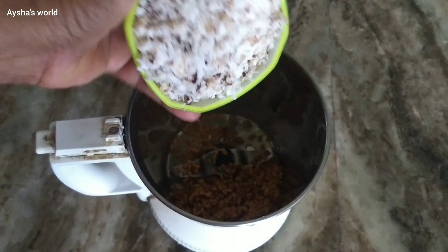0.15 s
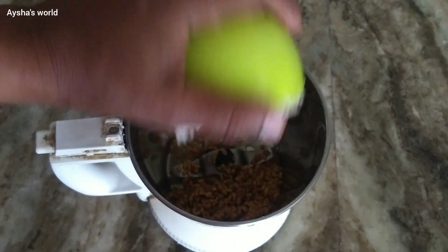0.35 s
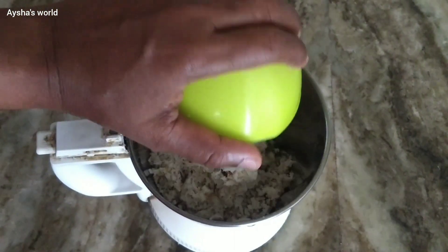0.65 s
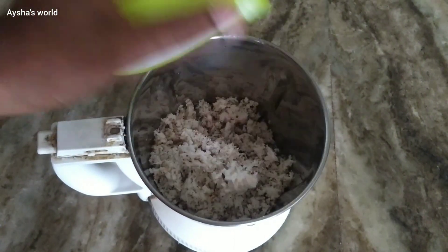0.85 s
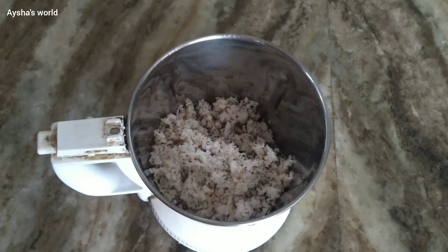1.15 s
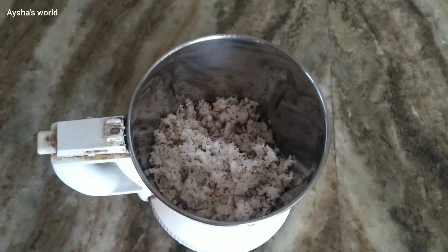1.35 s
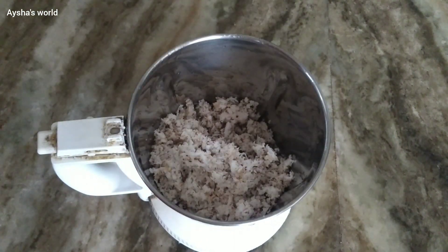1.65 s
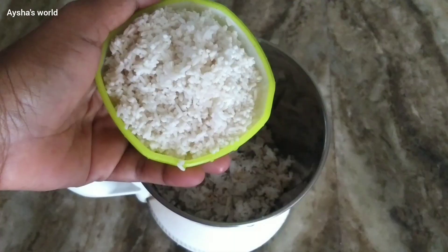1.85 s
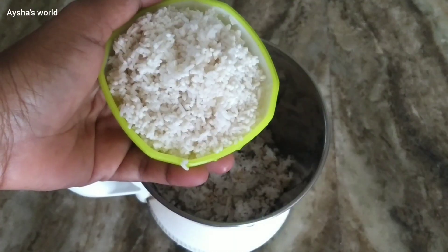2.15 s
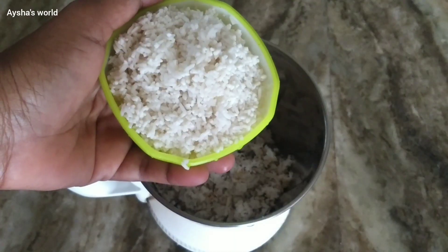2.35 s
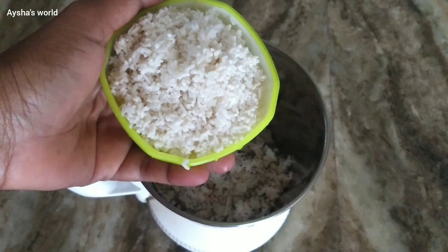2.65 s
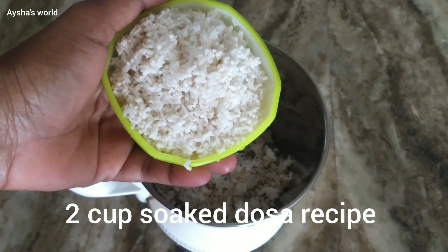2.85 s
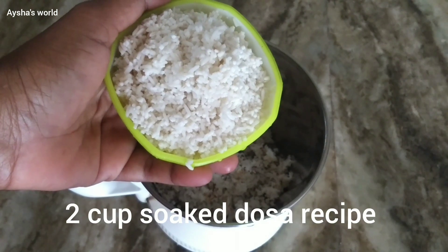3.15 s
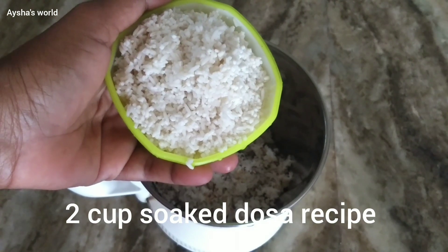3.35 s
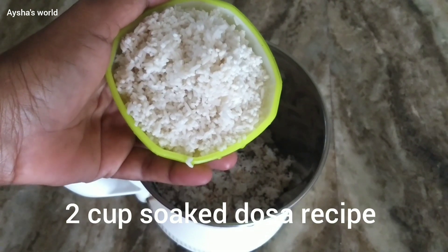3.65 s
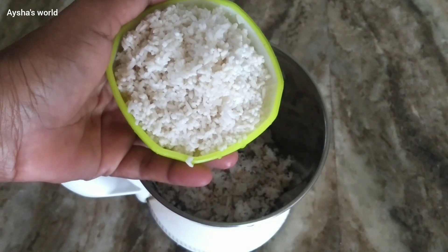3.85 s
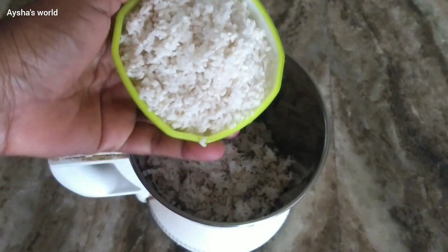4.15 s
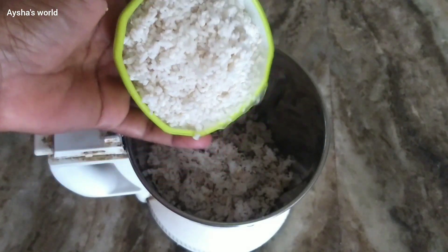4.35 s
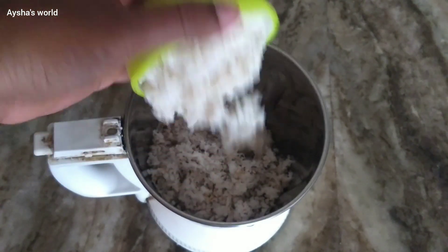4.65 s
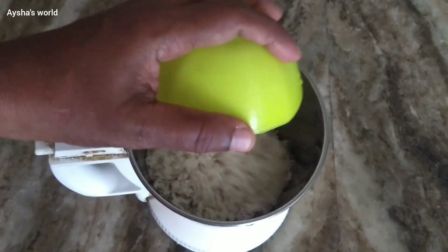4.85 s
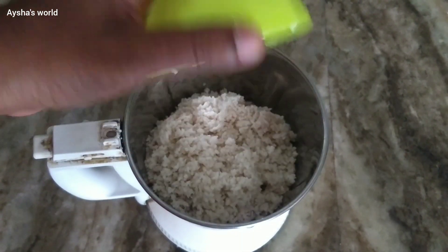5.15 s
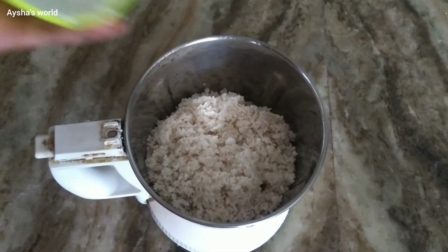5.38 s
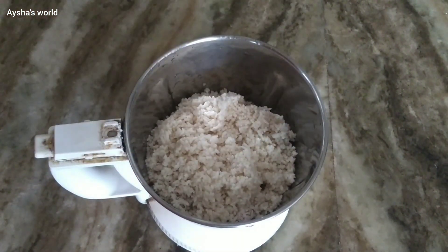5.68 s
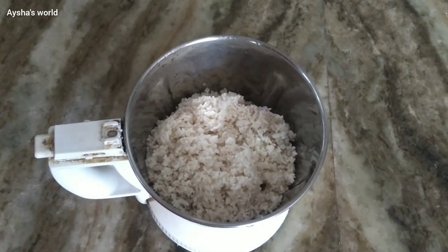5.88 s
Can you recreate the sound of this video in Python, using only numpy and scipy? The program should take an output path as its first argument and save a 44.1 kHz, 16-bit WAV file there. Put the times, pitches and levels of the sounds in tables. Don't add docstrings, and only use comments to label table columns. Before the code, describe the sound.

Steady mid-pitched hum with airy fan rush, metallic clinks and hollow cup knocks, a short silent gap, then more taps and grains sliding into steel.

```python
import sys
import numpy as np
from scipy import signal
from scipy.fft import rfft, irfft, next_fast_len
from scipy.io import wavfile

SR = 44100
rng = np.random.default_rng(int(sys.argv[2]) if len(sys.argv) > 2 else 0)


def voltage_ratio(decibels):
    exponent = np.asarray(decibels, float) / 20
    return 10 ** exponent


def transcribe(signal):
    frames = np.atleast_2d(signal).T
    limited = np.clip(frames, -1, 1)
    pcm = np.round(limited * 32767).astype(np.int16)
    wavfile.write(sys.argv[1], SR, pcm)


N = 265526
HZ = np.fft.rfftfreq(next_fast_len(N), 1 / SR)

LINE_HZ = [50.4, 140, 161.5, 200.2, 226.5, 275.5, 298, 343, 399.7, 500.3, 600.5, 650, 758.2, 775.8, 800.2,
           824.6, 901, 1025, 1350, 1951, 2400, 3400, 5120]
# near_level_db, far_relative_db, wander_hz, unsteady_share (0-1)
LINES = [(-45.5, -2.7, 4, .4), (-47.5, -3, 8, 1), (-52, -3.5, 3, .5), (-48, -1.8, 1, 0.2),
         (-47.5, -3, 6.9, .8), (-46, -2.7, 8.5, 0.9), (-48, -2.5, 12, 1), (-52.5, -3, 7.2, .8),
         (-55, -12, 4, .5), (-53.5, -.5, 4, 0.35), (-74.5, -8.5, 4, .5), (-57.5, -27.5, 36, .95),
         (-48.7, -7, 7, .45), (-50.6, -3.7, 4, .35), (-45.6, 3.7, 9, .36), (-51, -10, 4, .35),
         (-59.5, -3.5, 5, .6), (-60.5, -2, 8, .8), (-58.5, -4, 30, .95), (-55.5, -5, 26, 0.6),
         (-59, -0.5, 130, 1), (-61, 0.5, 90, 1), (-67, -4.5, 40, .95)]
# time_s, level_db
WHINE_LEVEL = [(0.0, -41), (0.17, -43.5), (0.5, -40), (1.05, -42), (1.75, -42.5), (2.9, -42.5), (3.6, -40.5),
               (4.3, -40.5), (4.55, -43), (5, -41), (5.5, -40.5), (5.7, -42), (5.9, -39.5)]
WHINE_HZ = (740, 840)
# frequency_hz, density_db (per Hz)
AIR_SPECTRUM = [(28, -100), (45, -67), (100, -65), (260, -70), (430, -74), (700, -73.5), (950, -98.5),
                (1500, -79.5), (2400, -94.5), (3500, -90), (5500, -92.6), (8500, -100.2), (12000, -103),
                (16000, -104)]
# frequency_hz, likeness (0-1), far_level_db, far_phase_rad
PORT_FIELD = [(50, .98, -2.9, .1), (100, .97, -2.5, -.05), (300, .955, -2.7, -.12), (500, .8, -1.4, -.6),
              (680, .75, -2.5, -.4), (800, .55, -2, .08), (1100, .6, -.6, 0), (1600, .42, -2.4, -1.2),
              (2500, .15, -2.3, -1), (5000, .05, -1.2, 0), (8500, .05, -1.5, 0), (15000, .05, -1.2, 0)]
# centre_hz, width_hz, resting_level_db
RUSTLE_BANDS = [(1100, 1620, -47.5), (2950, 3130, -57), (6300, 2700, -67.5), (11800, 6500, -78)]
# peak_s, level_db (at 3 kHz), rise_s (per 20 dB), fall_s (per 20 dB), tilt_db (per octave)
MOVES = [(.32, -46, .25, .12, -2), (.554, -32, .012, .03, -2), (.582, -45, .015, .25, -2),
         (.87, -44, .025, .3, -7), (1.3, -49, .06, .3, 0), (1.63, -49, .12, .13, -4),
         (2.56, -53, .05, .15, -2), (2.8, -51, .1, .15, -3), (3.158, -45.5, .01, .2, -5),
         (3.282, -38.5, .04, .3, -4.5), (3.77, -53, .05, .2, -2), (3.9, -53, .2, .4, -7),
         (3.995, -50, .02, .3, -1), (4.36, -44, .05, .22, -6), (4.652, -45, .015, .2, -6),
         (5.41, -40, .09, .05, 0), (5.45, -40, .05, .3, -7), (5.87, -51, .1, .2, -3),
         (5.97, -54, .15, .2, -8)]
# peak_s, level_db, rise_s, fall_s, tilt_db (per octave)
POUR = [
    (4.725, -47, .03, .2, 3.5),
    (4.775, -45, .04, .25, 2),
    (4.86, -41, .13, .1, 4),
    (4.92, -40.5, .08, .12, 3.5),
    (4.87, -47, .15, .25, -7),
]
# start_s, peak_db, ring_hz, tail_db
CLINKS = [(0.174, -42, 3440, -20), (0.4858, -40.5, 3390, -10), (0.5288, -31, 3310, -21),
          (1.0196, -41, 3100, -18), (1.1372, -46.5, 3606, -12), (1.2625, -39, 3490, -14),
          (1.6062, -36.5, 3210, -17), (2.5571, -33.5, 3440, -9), (3.0545, -46, 3500, -2),
          (3.2156, -32.5, 3360, -11), (3.7709, -35, 3350, -12), (4.3415, -38, 3420, -5),
          (4.4857, -40, 3220, -9), (4.7619, -36.5, 3770, -6), (4.7781, -33, 3200, -9),
          (4.807, -32, 3270, -23), (5.3592, -27.5, 3440, -40), (5.4035, -27, 3400, -30),
          (5.409, -27, 3100, -30), (5.7453, -46, 3260, -7), (5.8628, -33.5, 3500, -29)]
# start_s, peak_db, ring_hz, tail_db
TICKS = [(0.1999, -38.5, 5550, -13.5), (0.2164, -37, 5450, -8.5), (0.5501, -28, 5240, -25.5),
         (0.7871, -43, 5590, -11), (1.0694, -47, 6200, -10), (1.275, -39.5, 5970, -7.5),
         (1.3433, -34, 5660, -9), (1.6094, -45.5, 5800, -3), (2.7686, -45, 5060, 0.5),
         (3.1602, -41.5, 5700, -4.5), (3.2755, -39, 5550, -14), (3.7474, -42.5, 5820, -10),
         (3.8804, -46, 6100, -10.5), (3.9913, -31.5, 5870, -13), (4.0294, -45.5, 5650, -1),
         (4.7624, -32.5, 5890, -4.5), (4.8444, -30, 6380, -11.5), (4.8844, -35, 5770, -12.5),
         (4.9077, -32.5, 5560, -12), (5.0704, -47, 5980, -15), (5.1327, -44, 5540, -13),
         (5.4041, -30, 5770, -9)]
# start_s, peak_db, ring_hz, tail_db
TAPS = [
    (.216, -28.5, 2100, -9),
    (.5445, -35, 2600, -20),
    (.5512, -25, 1767, -19),
    (.8624, -24.5, 2440, -9),
    (1.5195, -28.5, 2420, -11),
    (3.1555, -35.5, 1780, 1),
    (3.2744, -22, 2370, -12),
    (4.647, -34.5, 2370, -15),
    (5.363, -38.5, 2180, -14.5),
    (5.4325, -24, 2390, -7),
]
# start_s, peak_db, ring_hz, tail_db
KNOCKS = [(0.296, -24.5, 697, -15), (0.316, -28, 720, -8), (0.339, -32, 751, -18), (0.862, -30, 1340, -8.5),
          (1.619, -39, 1000, -4), (3.212, -28, 1120, -18), (3.224, -24, 950, -24), (3.245, -30, 900, -24),
          (3.257, -34.5, 827, -8), (3.269, -28, 1100, -9), (3.284, -27, 1400, -6), (4.647, -31, 760, -20),
          (5.439, -31.5, 1350, -2.5)]
# start_s, peak_db, ring_hz
GRAINS = [(0.4494, -58.5, 11000), (0.5781, -42.5, 12800), (0.6344, -53.5, 13100), (0.8744, -55, 10600),
          (3.2241, -49.5, 12000), (4.3146, -54.5, 12700), (4.6428, -47, 14800), (4.6794, -55.5, 14900),
          (4.7137, -48, 10400), (4.7264, -38.5, 13200), (4.7494, -39.5, 10800), (4.776, -38, 13200),
          (4.8095, -34, 12400), (4.8274, -38, 12400), (4.8404, -35.5, 12400), (4.8539, -29.5, 12300),
          (4.8674, -35, 10800), (4.8994, -41, 13000), (4.9142, -37, 12900), (4.9394, -37, 12900),
          (4.9574, -48, 12500), (5.1462, -53.5, 13100), (5.3644, -46, 14800)]
# start_s, peak_db, ring_hz, t60_s, grip_s (hand closes after)
CUP_NOTE = (.5516, -19, 646, .22, .021)
# start_s, peak_db, ring_hz, tail_db
THUDS = [
    (3.2, -40, 140, 2.5),
    (3.5, -41, 280, 4),
    (5.44, -33, 470, -5),
]
# start_s, peak_db, ring_hz, tail_db
PINGS = [
    (4.598, -33, 7700, -22),
    (4.6435, -33, 14800, -23.5),
]


def over_hz(table, column=1):
    table = np.array(table)
    return np.interp(np.log(HZ + 1), np.log(table[:, 0]), table[:, column])


def shape(x, gain):
    size = next_fast_len(N)
    return irfft(rfft(x, size) * gain, size)[..., :N]


def band(hz, width, axis=HZ):
    detuning = (axis ** 2 - hz ** 2) / (width * (axis + 1))
    return 1 / np.sqrt(1 + detuning ** 4)


def walk(rate_hz):
    x = shape(rng.standard_normal(N), np.exp(-(HZ / rate_hz) ** 2))
    return x / x.std()


def ports(shared, own):
    like = over_hz(PORT_FIELD)
    far = shape(shared, like) + shape(own, np.sqrt(1 - like ** 2))
    transfer = voltage_ratio(over_hz(PORT_FIELD, column=2)) * np.exp(1j * over_hz(PORT_FIELD, column=3))
    return np.array([shared, shape(far, transfer)])


def drone():
    out = np.zeros((2, N))
    t = np.arange(N) / SR
    course = np.array(WHINE_LEVEL)
    course_db = np.interp(t, course[:, 0], course[:, 1] - np.median(course[:, 1]))
    likeness, far_phase = over_hz(PORT_FIELD), over_hz(PORT_FIELD, column=3)
    for hz, (near_db, far_db, wander_hz, share) in zip(LINE_HZ, LINES):
        nearest_bin = int(hz * N / SR)
        like = likeness[nearest_bin]
        phase = np.array([[0], [far_phase[nearest_bin]]])
        near, other = (walk(wander_hz) + 1j * walk(wander_hz) for _ in range(2))
        wander = np.array([near, like * near + np.sqrt(1 - like ** 2) * other])
        start_turn = rng.random() * (not 770 < hz < 830)
        wobble = np.sqrt(1 - share) + np.sqrt(share / 2) * wander
        carrier = np.exp(2j * np.pi * (hz * t + start_turn) + 1j * phase)
        line = np.sqrt(2) * np.real(wobble * carrier)
        level_db = near_db + np.array([[0], [far_db]])
        if WHINE_HZ[0] < hz < WHINE_HZ[1]:
            level_db = level_db + course_db
        out += voltage_ratio(level_db) * line
    return out


def air():
    base = ports(*rng.standard_normal((2, N))) * np.sqrt(SR / 2)
    spectrum = voltage_ratio(over_hz(AIR_SPECTRUM))
    out, swell, octave = 0, walk(1.1), np.log2(HZ / 40 + 1)
    for k in range(10):
        overlap = np.clip(1 - abs(octave - k), 0, 1)
        out = out + shape(base, spectrum * overlap) * voltage_ratio(0.23 * swell + 1.7 * walk(11))
    return out


def rustle(grains_per_s=2500, scatter_db=3, wet_db=-4.5, dry_db=-5, bend_db=3.1):
    t, out = np.arange(N) / SR, 0
    movements = [*MOVES, *POUR]
    swells_db = [db - 20 * np.where(t < peak_s, (peak_s - t) / rise_s, (t - peak_s) / fall_s)
                 for peak_s, db, rise_s, fall_s, _ in movements]
    power = voltage_ratio(2 * np.maximum(swells_db, -150))
    tilt_db = np.array(movements)[:, 4]
    for hz, width, rest_db in RUSTLE_BANDS:
        present = rng.random(N) < grains_per_s / SR
        size = present * voltage_ratio(scatter_db * np.minimum(rng.exponential(size=N), 2.5))
        grains = size * rng.standard_normal((2, N))
        scatter = rng.standard_normal((2, N))
        mix = shape(voltage_ratio(dry_db) * grains / grains.std() + voltage_ratio(wet_db) * scatter, band(hz, width))
        octave = np.log2(hz / 3000)
        colour = voltage_ratio(2 * (tilt_db * octave - bend_db * octave ** 2))
        level = np.sqrt(voltage_ratio(2 * rest_db) + colour @ power)
        out = out + mix / mix.std() * level * voltage_ratio(1.3 * walk(25))
    return ports(*out)


def strikes(table, turns, tail_t60, crack_db, rise_s, spread):
    out, size = np.zeros((2, N)), SR // 3
    t, axis = np.arange(size) / SR, np.fft.rfftfreq(size, 1 / SR)
    for start_s, db, hz, tail_db in table:
        noise = rng.standard_normal((2, size))
        noise = irfft(rfft(noise) * band(hz, spread * hz, axis=axis), size)
        ring = np.sin(2 * np.pi * hz * t) * voltage_ratio(-60 * t * hz / turns) * (1 - np.exp(-t / rise_s))
        crack = voltage_ratio(crack_db) * np.exp(-t / (4 * rise_s + .001))
        tail = voltage_ratio(tail_db - 60 * t / tail_t60) * (1 - np.exp(-t / .006))
        blow = voltage_ratio(db) * (ring + (crack + tail) * noise / noise.std())
        i = int(start_s * SR)
        out[:, i:i + size] += blow[:, :N - i]
    return out


def clinks():
    return strikes(CLINKS, turns=54, tail_t60=.27, crack_db=-8, rise_s=.0005, spread=.45)


def ticks():
    return strikes(TICKS, turns=57, tail_t60=.27, crack_db=-.5, rise_s=.0003, spread=.48)


def taps():
    return strikes(TAPS, turns=70, tail_t60=.38, crack_db=-6, rise_s=.00034, spread=.7)


def knocks():
    return strikes(KNOCKS, turns=24, tail_t60=.3, crack_db=-9, rise_s=.0025, spread=.55)


def grains_on_steel():
    rows = [(*row, -9) for row in GRAINS]
    return strikes(rows, turns=50, tail_t60=.07, crack_db=1.5, rise_s=.0009, spread=1.5)


def cup():
    start_s, db, hz, t60, grip_s = CUP_NOTE
    t = np.maximum(np.arange(N) / SR - start_s, 0)
    ring = voltage_ratio(db - 60 * t / t60) * np.sin(2 * np.pi * hz * t)
    note = ring * (1 - np.exp(-t / .0015)) * np.exp(-(t / grip_s) ** 8)
    return np.array([note, note])


def thuds():
    return strikes(THUDS, turns=35, tail_t60=.4, crack_db=-16, rise_s=.0011, spread=.45)


def pings():
    return strikes(PINGS, turns=60, tail_t60=.09, crack_db=-8, rise_s=.0005, spread=.45)


def scene():
    blows = clinks() + ticks() + taps() + knocks() + grains_on_steel() + cup() + thuds() + pings()
    return drone() + air() + rustle() + ports(*blows)


def widen(x, top_hz, gain=.8, lag_s=.000431, rolloff_hz=18000, lag_shrink=.04):
    lag = lag_s * (1 - lag_shrink * (HZ / top_hz) ** 4)
    crossing = np.exp(-2j * np.pi * HZ * lag) / (1 + (HZ / rolloff_hz) ** 2)
    return x - gain * shape(x[::-1], crossing)


def scene_change(cut_s=1.787, cut_len_s=.003, back_s=2.157, fade_in_s=.2):
    t = np.arange(N) / SR
    first_level = voltage_ratio(np.interp(t, (0, cut_s), (-3, -.6)))
    second_level = voltage_ratio(np.interp(t, (back_s, N / SR), (-2.6, -1.1)))
    closing = np.clip(1 - (t - cut_s) / cut_len_s, 0, 1)
    opening = 1 - np.exp(-np.maximum(t - back_s, 0) / fade_in_s)
    return first_level * closing + second_level * opening


def top_cut(x):
    return signal.sosfilt(signal.butter(12, 15970, fs=SR, output="sos"), x)


def record(dry):
    top_hz = 15750
    wide = widen(dry, top_hz)
    wide = shape(wide, (HZ < top_hz) / (1 + (HZ / 17500) ** 8))
    wide = signal.sosfilt(signal.butter(4, 42, "high", fs=SR, output="sos"), wide)
    return top_cut(wide * scene_change())


dry = scene()
out = record(dry)
transcribe(out)
```